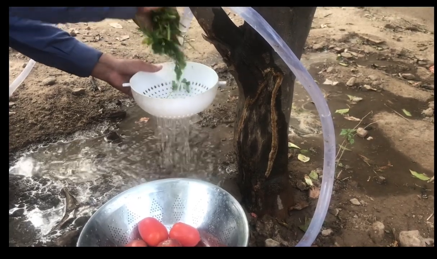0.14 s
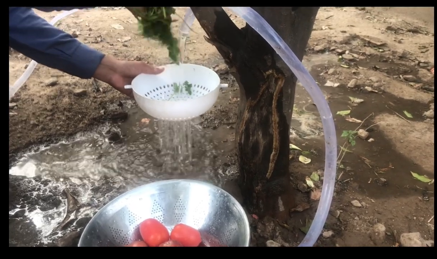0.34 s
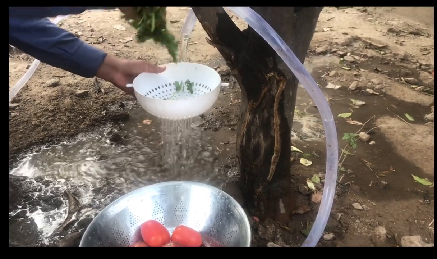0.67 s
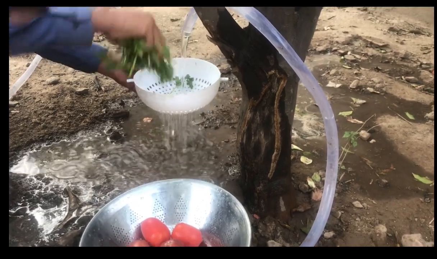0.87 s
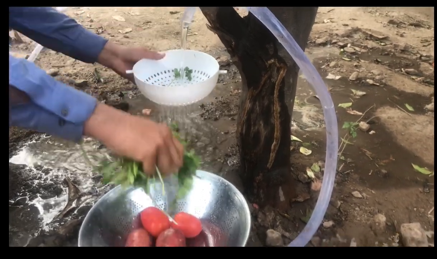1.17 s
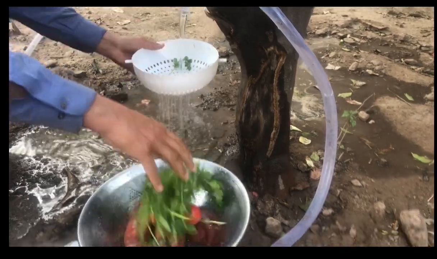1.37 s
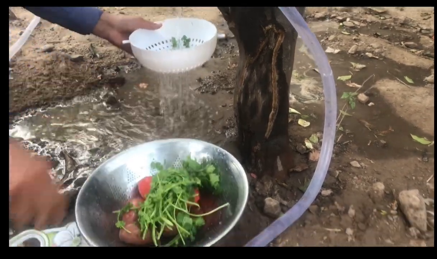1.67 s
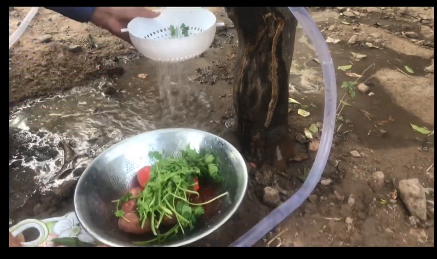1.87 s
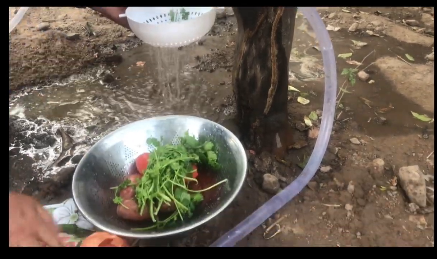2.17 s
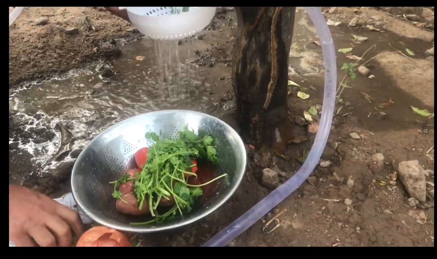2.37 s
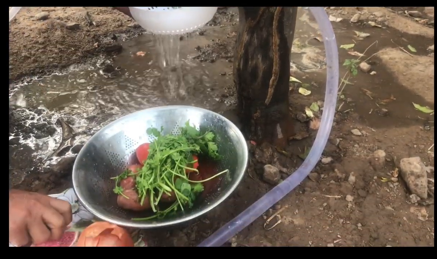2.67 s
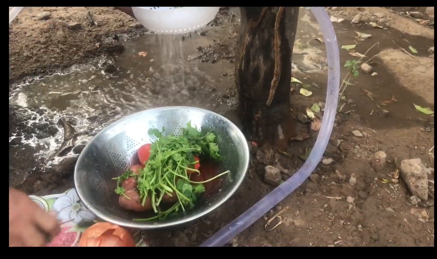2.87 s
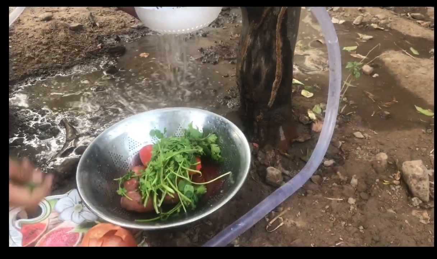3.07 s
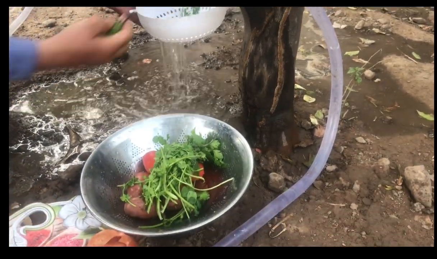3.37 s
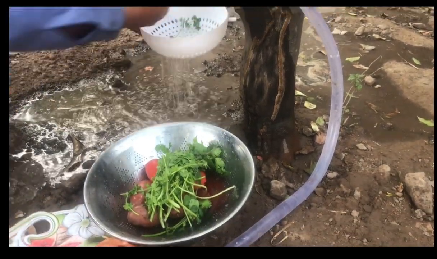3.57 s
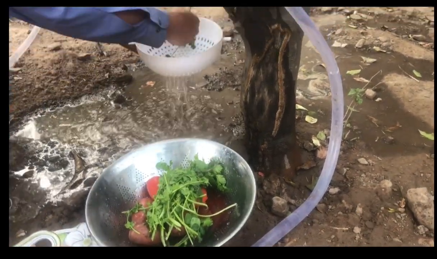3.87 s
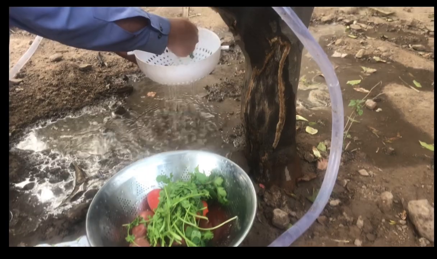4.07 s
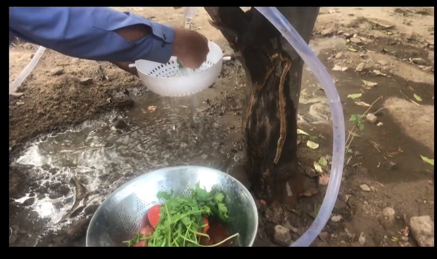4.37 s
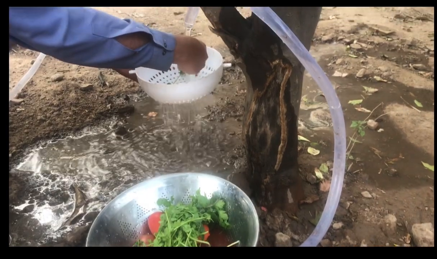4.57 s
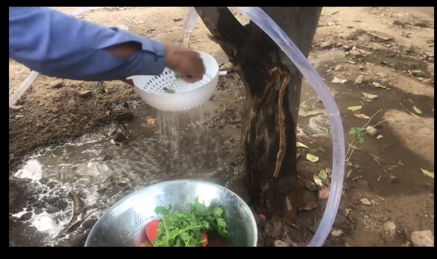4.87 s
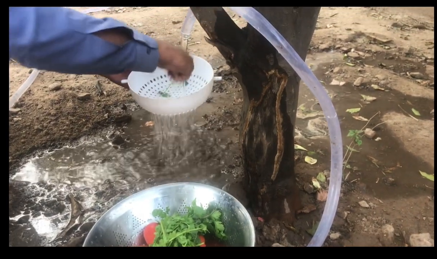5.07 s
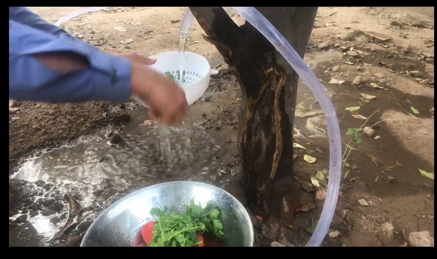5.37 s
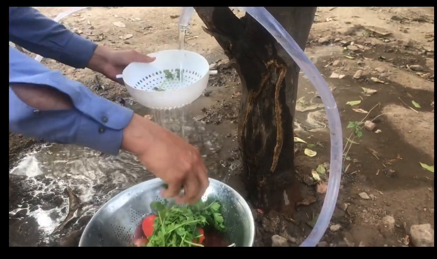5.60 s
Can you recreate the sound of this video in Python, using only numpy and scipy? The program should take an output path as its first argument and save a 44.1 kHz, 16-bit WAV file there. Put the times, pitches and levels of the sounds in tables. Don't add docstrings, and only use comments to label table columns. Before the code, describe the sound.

Steady splashing and bubbling water outdoors over a low beating motor, an object thudding down near two seconds, then hollow plastic taps.

```python
import sys
import numpy as np
from scipy import signal
from scipy.fft import rfft, irfft
from scipy.io import wavfile
from scipy.ndimage import uniform_filter1d

SR = 44100
rng = np.random.default_rng(int(sys.argv[2]) if len(sys.argv) > 2 else 0)


def inscribe(sig):
    pcm = np.round(np.clip(np.atleast_2d(sig).T, -1, 1) * 32767)
    wavfile.write(sys.argv[1], SR, pcm.astype(np.int16))


def natural_amplitude(level_db):
    exponent = np.asarray(level_db, float) / 20
    return 10 ** exponent


N = 253134

# freq_hz, density_db_per_hz
RUMBLE_SPECTRUM = [(12, -35), (20, -23), (43, -28), (62, 3.5), (80, 1.5), (93, -4.5), (109, -27.5),
                   (123, 5), (141, -6), (193, -21), (216, -13.5), (264, -28.5), (400, -25.5), (520, -52),
                   (880, -120)]
# freq_hz, width_hz, level_db
ENGINE_HUMS = [(44.1, 4.2, -46), (98.05, 13.8, -41.5)]
FIRING_TONES_HZ = [70.83, 81]
# peak_s, lower_tone_db, upper_tone_db, chest_hum_db
ENGINE_SURGES = [(0.0,-32,-31.5,-34.5), (0.26,-37,-32.5,-40.5), (0.49,-31.5,-41,-37), (0.71,-39,-32.5,-39),
                 (0.91,-31,-48,-45.5), (1.03,-42,-32.5,-49), (1.21,-33,-34,-53), (1.49,-33.5,-46,-45),
                 (1.71,-32.5,-35,-45.5), (1.84,-30,-45,-43.5), (2.102,-43,-24.5,-45.5), (2.3,-32.5,-25,-44),
                 (2.45,-52,-25.5,-45), (2.64,-51,-31.5,-54), (2.83,-43,-33.5,-48.5), (2.98,-42,-32.5,-58),
                 (3.19,-46,-33,-46), (3.41,-42,-37,-43), (3.68,-38,-33,-41.5), (3.83,-51,-31.5,-66),
                 (4.02,-36,-32,-43.5), (4.31,-36.5,-32,-49), (4.5,-55,-36.5,-64), (4.62,-38,-35,-56),
                 (4.79,-38,-39.5,-48), (4.97,-40,-46,-43), (5.2,-34,-36.5,-59), (5.32,-37,-34.5,-50),
                 (5.47,-42,-35.5,-51.5), (5.65,-46,-38,-54)]
SURGE_HALF_WIDTH_S, TONE_IDLE_DB, CHEST_IDLE_DB = 0.055, -45, -49.5
TOP_HUM_DB, TOP_HUM_RISE_DB_PER_S = -53, 0.21

# time_s, flow_db
WATER_FLOW = [(0.0, -50.5), (1.4, -50.5), (1.7, -51.5), (1.95, -50), (2.8, -51.5), (3.5, -50.5),
              (4.2, -51.5), (5.2, -52), (5.74, -52.5)]
# freq_hz, density_db_per_hz
SPLASH_SPECTRUM = [(130, -22.5), (220, -1.5), (270, -2.5), (426, -14.5), (660, -11.5), (800, -13.5),
                   (886, -10), (1070, -14.5), (1370, -13.5), (2100, -29.5), (2500, -34), (3250, -93),
                   (5500, -120)]
# freq_hz, density_db_per_hz
SPRAY_SPECTRUM = [(1060, -18), (1800, -1), (2100, -7), (2450, -3.5), (2650, -9), (3610, -8.5), (4520, -11),
                  (4940, -11.5), (6080, -13), (7690, -17), (10200, -16), (14000, -10.5), (15600, -17)]
SPRAY_DB, SPRAY_FOLLOW_RATIO = -59, 0.56

# freq_hz, density_db_per_hz
DRIP_SPECTRUM = [(900, -9), (2500, -0.5), (6000, -5)]
DRIP_DB, DRIP_LAID_S, DRIP_LAID_DB = -69, 1.6, -12

# start_s, end_s, freq_hz, width_hz, level_db
WHINE_TONES = [
    (3.22, 3.39, 785, 60, -57),
    (4.62, 5.08, 930, 30, -57),
    (.05, .55, 930, 90, -59),
    (3.45, 4.8, 8037, 10, -78),
    (1.5, 5.74, 12656, 90, -78),
    (2.0, 5.74, 10810, 60, -80),
    (0.0, 5.74, 7150, 90, -87),
]

# start_s, peak_db, pitch_hz
PLOP_EVENTS = [(0.438, -41, 912), (0.573, -32.5, 900), (1.016, -32.5, 1400), (1.162, -38, 890),
               (1.261, -38, 1410), (1.56, -48, 910), (1.79, -34, 1450), (1.868, -35, 1270),
               (2.339, -37, 670), (2.4, -31.5, 695), (2.534, -39.5, 1350), (2.68, -40, 1400),
               (2.748, -36.5, 1240), (2.789, -42, 1140), (2.854, -35.5, 1070), (3.591, -33, 656),
               (3.611, -28.5, 710), (4.195, -34, 836), (4.875, -33, 934), (5.147, -31, 555),
               (5.167, -36, 970), (5.203, -30, 570), (5.243, -39, 577), (5.265, -41, 870),
               (5.534, -35.5, 690)]
# start_s, peak_db, pitch_hz
DROP_EVENTS = [(0.2054, -46, 4200), (0.286, -40, 2720), (0.3726, -43.5, 2490), (0.4534, -46, 3720),
               (0.5905, -43.5, 3270), (0.7228, -38.5, 2460), (1.0281, -47, 3580), (1.036, -47, 2400),
               (1.262, -43.5, 2920), (1.344, -38.5, 3400), (1.3713, -45, 2400), (1.5025, -53, 2430),
               (1.808, -33.5, 2520), (1.8671, -45, 2400), (2.1185, -42, 2410), (3.2276, -47, 2820),
               (3.8067, -45, 2400), (3.9449, -48, 2960), (4.0706, -47, 2460), (4.7446, -47, 2400),
               (5.1023, -45.5, 2810), (5.1482, -48, 2480), (5.652, -50, 2940), (5.7278, -40, 2400)]
# start_s, peak_db, pitch_hz
TICK_EVENTS = [(0.412, -44, 12600), (0.4524, -47, 14300), (0.7502, -52, 13700), (0.7806, -49, 13700),
               (1.0296, -44, 11700), (1.2655, -47, 13500), (1.551, -33, 12500), (1.6734, -39, 13800),
               (2.1041, -42, 13200), (2.5531, -45, 12600), (4.0198, -45, 11800), (4.4812, -42, 14100),
               (4.564, -42, 9950), (5.1836, -46, 12500), (5.2031, -44, 13200)]
PLOP_T60_S, DROP_T60_S, TICK_T60_S = 0.027, 0.011, 0.006

# start_s, peak_db
SMACK_EVENTS = [(0.223, -46), (0.4145, -46), (0.75, -47), (1.06, -46), (1.2458, -47), (1.2674, -49),
                (1.4903, -49), (1.503, -42), (2.5257, -47), (4.4812, -50), (4.8986, -46), (5.7269, -49)]
SMACK_HZ = 6000

# start_s, level_db, centre_hz, width_hz, t60_s
RUSTLE_BURSTS = [
    (0.721, -56, 5000, 6000, 0.24),
    (1.334, -51, 1500, 2500, 0.17),
    (1.81, -41.5, 1270, 1500, 0.22),
    (2.526, -47, 1400, 1200, .12),
    (3.205, -42, 2000, 1000, 0.06),
    (4.74, -51.5, 4500, 3000, 0.092),
    (5.135, -49.5, 1470, 2400, 0.17),
    (5.722, -48, 2500, 3500, 0.088),
    (1.806, -43, 2500, 1600, 0.077),
    (5.16, -54, 2200, 1800, 0.14),
]

# start_s, peak_db, brightness_db_per_octave
KNUCKLE_KNOCKS = [
    (3.652, -27, 0),
    (3.79, -24, 1),
    (5.131, -28, -2),
    (5.726, -38, 7),
]
# freq_hz, level_db, t60_s
COLANDER_MODES = [(580, -8, .04), (720, 1, .011), (980, 0, .011), (1300, -9, .01)]
# start_s, level_db, brightness_db_per_octave
SET_DOWN_BLOWS = [
    (1.8071, -21, -1),
    (1.8144, -19.5, -1),
    (1.8197, -33, 11),
    (1.8238, -22.5, -2),
    (1.832, -29, -1),
]
# freq_hz, level_db, t60_s
OBJECT_MODES = [(640, -8, 0.042), (860, -1, 0.026), (1276, -3, 0.058), (1450, -1, 0.032),
                (1730, -14, 0.026), (2590, -11.5, 0.022), (3150, -17, 0.0065), (4040, -23, 0.016)]

# freq_hz, width_hz, depth_db
MIC_DIPS = [(4940, 210, -3), (10270, 360, -2.5)]
MIC_EDGE_HZ = 15650


def evened(x):
    return x / np.sqrt(np.mean(x ** 2) + 1e-20)


def read(points, hz):
    f, value = np.transpose(points)
    return np.interp(np.log(hz + 1), np.log(f + 1), value)


def add(mix, start_s, sound):
    part = mix[round(start_s * SR):][:len(sound)]
    part += sound[:len(part)]


def resonate(x, hz, width_hz):
    turn = np.exp(2j * np.pi * np.cumsum(hz * np.ones(len(x))) / SR)
    r = np.exp(-np.pi * width_hz / SR)
    slow = signal.lfilter([1 - r], [1, -r], x / turn + 1e-18)
    slow = signal.lfilter([1 - r], [1, -r], slow)
    return evened((turn * slow).real)


def colour(x, points):
    gain = natural_amplitude(read(points, np.fft.rfftfreq(len(x), 1 / SR)))
    return evened(irfft(rfft(x) * gain, len(x)))


def ring(hz, t60_s, glide=0., rise_s=0.0012, size=2400):
    t = np.arange(size) / SR
    envelope = (1 - np.exp(-t / rise_s)) * natural_amplitude(-60 * t / t60_s)
    return envelope * np.sin(2 * np.pi * hz * t * (1 + glide * np.minimum(t / t60_s, 1)))


def wash(points, patch_db, gust_db, size=256):
    frames, bins = 4 * N // size + 5, size // 2 + 1
    a, b, patches = rng.standard_normal((frames, bins, 3)).T
    patches = uniform_filter1d(patches, size=8, axis=0)
    patches = evened(uniform_filter1d(patches, size=24, axis=1))
    gusts = evened(uniform_filter1d(rng.standard_normal(frames), size=12))
    z = (a + 1j * b) * natural_amplitude(patch_db * patches + gust_db * gusts)
    noise = signal.istft(z, nperseg=size, noverlap=size - size // 4)[1][:N]
    return colour(noise, points)


def patter(points, lo_hz, hi_hz, per_s, cycles, spread_db, size):
    when, pitch, big = rng.random((4000, 3))[:round(per_s * N / SR)].T[:, :, None]
    hz = lo_hz * (hi_hz / lo_hz) ** pitch
    gain = natural_amplitude(read(points, hz) + spread_db * np.minimum(-np.log(big), 3.2)) * hz
    grains = gain * ring(hz, cycles / hz, glide=0.2, rise_s=1.1 / hz, size=size)
    at = (when * N).astype(int) + np.arange(size)
    return evened(np.bincount(at.ravel(), grains.ravel(), minlength=N)[:N])


def water():
    level_db = np.interp(np.arange(N) / SR, *np.transpose(WATER_FLOW))
    splash = wash(SPLASH_SPECTRUM, patch_db=1.0, gust_db=0.97)
    splash += natural_amplitude(-7) * patter(SPLASH_SPECTRUM, lo_hz=500, hi_hz=2200, per_s=300,
                               cycles=13.8, spread_db=3, size=900)
    splash += natural_amplitude(-6.5) * patter(SPLASH_SPECTRUM, lo_hz=546, hi_hz=2623, per_s=200,
                                 cycles=48, spread_db=3, size=2000)
    spray = wash(SPRAY_SPECTRUM, patch_db=0.9, gust_db=0.56)
    spray += natural_amplitude(-9) * patter(SPRAY_SPECTRUM, lo_hz=2420, hi_hz=14500, per_s=540,
                              cycles=11, spread_db=4, size=250)
    spray += natural_amplitude(-11) * patter(SPRAY_SPECTRUM, lo_hz=2400, hi_hz=14000, per_s=250,
                               cycles=90, spread_db=2.5, size=700)
    spray_db = SPRAY_DB + SPRAY_FOLLOW_RATIO * (level_db - level_db.mean())
    return natural_amplitude(level_db + 0.5) * splash + natural_amplitude(spray_db) * spray


def surging(levels_db, idle_db):
    t = np.arange(0, N, 64) / SR
    peaks_s = np.transpose(ENGINE_SURGES)[0]
    bumps = np.exp(-((t[:, None] - peaks_s) / SURGE_HALF_WIDTH_S) ** 2)
    power = natural_amplitude(idle_db) ** 2 + bumps @ natural_amplitude(levels_db) ** 2
    return np.sqrt(np.interp(np.arange(N) / SR, t, power))


def engine():
    _, low_db, high_db, chest_db = np.transpose(ENGINE_SURGES)
    noise = rng.standard_normal((6, N))
    out = natural_amplitude(-41.5) * colour(noise[0], RUMBLE_SPECTRUM)
    for hz, width_hz, db in ENGINE_HUMS:
        out += natural_amplitude(db) * resonate(noise[1], hz, width_hz)
    for hz, db, chance in zip(FIRING_TONES_HZ, (low_db, high_db), noise[2:]):
        drift = uniform_filter1d(uniform_filter1d(chance, size=6000), size=6000)
        waver_hz = hz + 1.446 * evened(drift)
        tone = np.sqrt(2) * np.sin(2 * np.pi * np.cumsum(waver_hz) / SR)
        out += surging(db, TONE_IDLE_DB) * tone
    chest = resonate(noise[4], 150.96, 12.3) + natural_amplitude(1.5) * resonate(noise[4], 131.7, 76)
    top = resonate(noise[5], 188.8, 9.3) + natural_amplitude(-2) * resonate(noise[5], 192.6, 28.7)
    top_db = TOP_HUM_DB + TOP_HUM_RISE_DB_PER_S * np.arange(N) / SR
    return out + surging(chest_db, CHEST_IDLE_DB) * chest + natural_amplitude(top_db) * top


def drips():
    laid = np.clip((np.arange(N) / SR - DRIP_LAID_S) / 0.3, 0, 1)
    blips = patter(DRIP_SPECTRUM, lo_hz=1200, hi_hz=6000, per_s=56, cycles=9.6, spread_db=6.5, size=700)
    return natural_amplitude(DRIP_DB + DRIP_LAID_DB * laid) * blips


def whines():
    out, noise = np.zeros(N), rng.standard_normal(N)
    for start_s, end_s, hz, width_hz, db in WHINE_TONES:
        part = noise[round(start_s * SR):round(end_s * SR)]
        drift = uniform_filter1d(part, size=1500)
        waver_hz = hz + 0.4 * width_hz * evened(drift - drift.mean())
        tone = np.sin(2 * np.pi * np.cumsum(waver_hz) / SR)
        tone += 0.35 * resonate(part, hz, width_hz)
        add(out, start_s, natural_amplitude(db) * tone * signal.windows.tukey(len(part), 0.15))
    return out


def droplets():
    out = np.zeros(N)
    kinds = (  # table, t60_s, trim_db, smack_db
        (PLOP_EVENTS, PLOP_T60_S, 2.5, -9),
        (DROP_EVENTS, DROP_T60_S, 3.5, -3),
        (TICK_EVENTS, TICK_T60_S, -1.5, -20))
    for table, t60_s, trim_db, smack_db in kinds:
        spreads = rng.uniform(0.9, 1.35, (len(table), 4))
        for (start_s, db, hz), spread in zip(table, spreads):
            bubble = ring(hz, t60_s, glide=0.034, rise_s=2.9 / hz)
            smack = sum(ring(hz * k, 0.74 * t60_s, rise_s=1.5 / hz) for k in spread) / 2
            add(out, start_s, natural_amplitude(db + trim_db) * (bubble + natural_amplitude(smack_db) * smack))
    return out


def smacks():
    out = np.zeros(N)
    for (start_s, db), chance in zip(SMACK_EVENTS, rng.random((len(SMACK_EVENTS), 8, 1))):
        spread = 0.5 + 1.26 * (np.arange(8)[:, None] + chance) / 8
        tones = ring(SMACK_HZ * spread, 0.0042, rise_s=0.0002, size=400)
        add(out, start_s, natural_amplitude(db - 1) * tones.sum(0))
    return out


def rustles():
    out, t = np.zeros(N), np.arange(9000) / SR
    noises = rng.standard_normal((len(RUSTLE_BURSTS), len(t)))
    for (start_s, db, hz, width_hz, t60_s), noise in zip(RUSTLE_BURSTS, noises):
        envelope = natural_amplitude(db - 60 * t / t60_s) * (1 - np.exp(-t / 0.0051))
        add(out, start_s, envelope * resonate(noise, hz, width_hz))
    return out


def knocks():
    out = np.zeros(N)
    for start_s, db, bright_db in KNUCKLE_KNOCKS:
        modes = sum(natural_amplitude(d + bright_db * np.log2(f / 800)) * ring(f, t60_s, rise_s=0.001)
                    for f, d, t60_s in COLANDER_MODES)
        add(out, start_s + 0.001, natural_amplitude(db - 1.5) * modes)
    detunes = rng.uniform(0.846, 1.05, (len(SET_DOWN_BLOWS), len(OBJECT_MODES)))
    for (start_s, db, bright_db), detune in zip(SET_DOWN_BLOWS, detunes):
        modes = sum(natural_amplitude(d + bright_db * np.log2(f / 1200)) * ring(f * k, t60_s, rise_s=0.00054)
                    for (f, d, t60_s), k in zip(OBJECT_MODES, detune))
        add(out, start_s, natural_amplitude(db - 6.5) * modes)
    add(out, 1.809, natural_amplitude(-12.5) * ring(215, 0.047, glide=-1.6, rise_s=0.0021))
    return out


def scene():
    steady = water() + engine() + drips() + whines()
    events = droplets() + smacks() + rustles() + knocks()
    return (steady + events)[None]


def roll_off(x):
    return signal.sosfilt(signal.butter(12, 15700, fs=SR, output="sos"), x)


def record(dry):
    hz = np.fft.rfftfreq(N, 1 / SR)
    dips_db = sum(db * np.exp(-((hz - f) / width_hz) ** 2) for f, width_hz, db in MIC_DIPS)
    mix = irfft(rfft(dry) * natural_amplitude(dips_db) * (hz < MIC_EDGE_HZ), N)
    return roll_off(mix)


dry = scene()
out = record(dry)
inscribe(out)
```